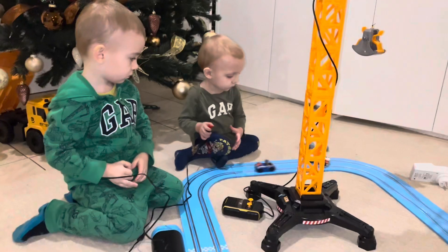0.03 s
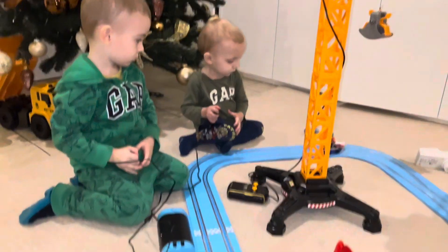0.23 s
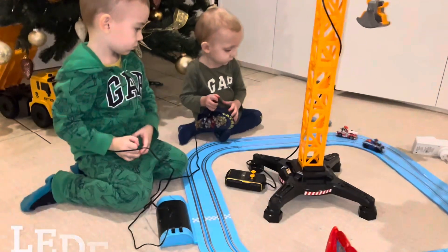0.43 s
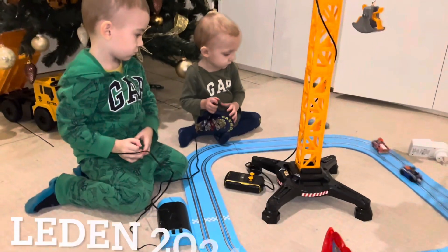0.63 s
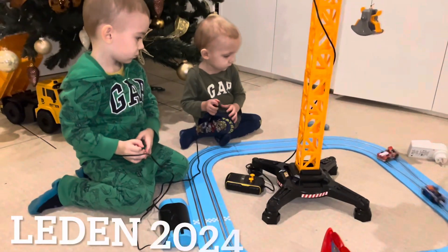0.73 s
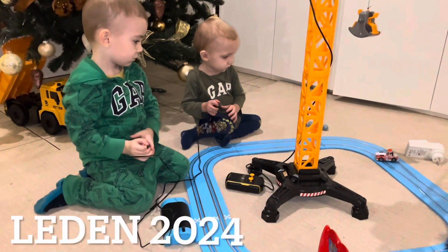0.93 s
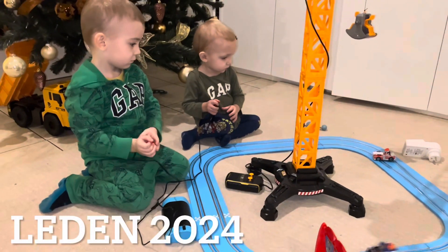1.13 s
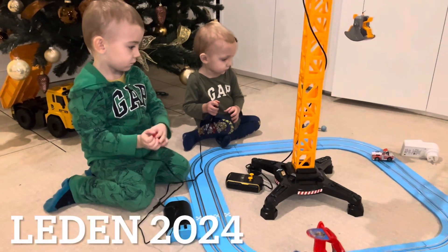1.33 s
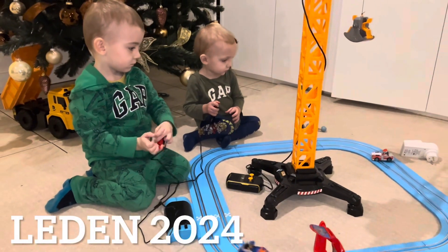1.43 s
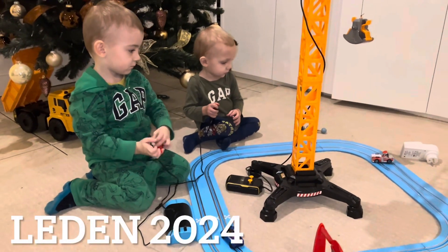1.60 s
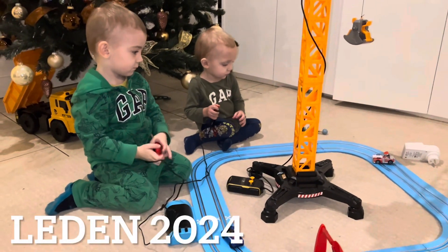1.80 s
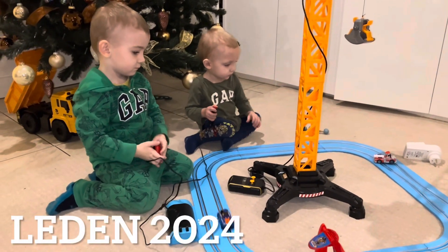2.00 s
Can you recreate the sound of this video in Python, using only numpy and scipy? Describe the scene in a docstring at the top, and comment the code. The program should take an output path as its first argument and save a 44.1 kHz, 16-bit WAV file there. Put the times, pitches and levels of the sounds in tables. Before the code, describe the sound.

Whirring toy car on a plastic track clicks over joints, dies away and pulls off again.

```python
"""A toy slot car whirs round a plastic track on a living-room floor, fades to near silence, starts again.
Its gears and sliding contacts rattle the shell and the track, and the motor sings in brief tones.
Rail joints click and the room answers them, over a low house hum. The sound fades in at the start."""
import sys
import numpy as np
from scipy import signal
from scipy.fft import rfft, irfft, next_fast_len
from scipy.io import wavfile
from scipy.ndimage import uniform_filter1d, map_coordinates

SR = 44100
rng = np.random.default_rng(int(sys.argv[2]) if len(sys.argv) > 2 else 0)


def master(y):
    """Save y as 16-bit WAV."""
    cut = np.clip(np.atleast_2d(y).T, -1, 1)
    pcm = np.round(cut * 32767)  # scale
    wavfile.write(sys.argv[1], SR, pcm.astype(np.int16))


N = 90669
TIME = np.arange(N) / SR


def car_lap():
    """Gears and contacts rattle shell and track: bands swell as the car passes, then the whir fades."""
    # The lap's mix. Each row: time in seconds, shell ring in dB, then in dB over the ring:
    # track rumble, track boom, rolling, gear rasp, contact whine, fizz, treble.
    mix = [(0.1, -37, -22.5, -13, -8, -5.5, -8.5, -10, -17),
           (0.2315, -40.5, -28, -21, -5, -6, -10.5, -13, -19),
           (0.236, -32, -23.5, -32, -7, -4.5, -5, -8.5, -16),
           (0.302, -39, -28, -20, -6, -3.5, -12.5, -8, -16.5),
           (0.424, -44, -17.5, -11.5, 1.5, -4, -5.5, -10.5, -7.5),
           (0.492, -39, -39, -25.5, -7, -6.5, -7, -8.5, -14),
           (0.52, -44.5, -23.5, -20, -0.5, -1.5, -5.5, -7, -11.5),
           (0.594, -39.5, -31, -35, -8, -4, -7, -9.5, -15),
           (0.632, -39, -28.5, -14.5, -5, -6, -8, -9, -14.5),
           (0.704, -36, -43, -20, -9.5, -4.5, -9.5, -12, -18),
           (0.72, -42, -21.5, -14, 0, 1, -5.5, -6.5, -11),
           (0.8, -39, -21.5, -10, -1, -4.5, -10.5, -12, -17.5),
           (0.86, -42, -14.5, -15, -1, -4.5, -6.5, -8, -10.5),
           (0.898, -40.5, -29, -17.5, -6, -4.5, -13.5, -10.5, -12.5),
           (1.058, -43.5, -22.5, -18.5, -4, -0.5, 0.5, -6, -11),
           (1.18, -39.5, -10.5, -15, -4.5, -5, -0.5, -9.5, -16),
           (1.248, -41.5, -22, -15, -5, 0, -3.5, -12, -19),
           (1.268, -35.5, -16, -11, -5.5, -2.5, -11, -10, -7.5),
           (1.306, -36, -20.5, -15, -5.5, -5, -12.5, -13.5, -23.5),
           (1.428, -41.5, -11, -13, -5, 0, 0, -6.5, -9), (1.466, -40, -15.5, -14, -7.5, -4, -8, -11.5, -9),
           (1.62, -52.5, -29, -11, -6.5, -6.5, -16.5, -18, -26.5),
           (1.78, -70, -43, -13.5, -1, -7, -16, -21, -25), (1.84, -66.5, -20, -31, -2.5, -2, -13, -8, -13)]
    # Edges of those bands in Hz, low to high; the shell ring is the fourth band.
    edges = [260, 520, 680, 1850, 3050, 5500, 6900, 10400, 15500]
    # The gear knocks. Each row: time in seconds, knocks per second, knocking share from 0 to 1.
    gears = [(0, 450, 0.08), (1.45, 400, 0.08), (1.84, 100, 0.05)]
    # Tone colour of car and track. Each row: frequency in Hz, level in dB.
    colour = [(150, -59), (250, -41), (353, -30), (516, -22), (593, -3.5), (635, -8.5), (1080, -3.5),
              (1820, -7.5), (2480, 4), (3160, -11), (5040, -12.5), (6210, 3), (7510, -16.5), (9500, -17),
              (10500, -36), (11500, -28.5), (14200, -33), (14900, -55)]
    # Shell resonances. Each row: centre in Hz, width in Hz, lift in dB.
    shell = [(324.3, 24, 10.5), (743, 120, 5), (1085, 12.5, 6), (2230, 110, 1.5), (2482, 67, 3.5),
             (2692, 120, 5), (3214, 155, -5), (6100, 160, -2.5)]
    ring_db, *over_ring = curves(mix)
    levels_db = [ring_db + db for db in over_ring[:3] + [0] + over_ring[3:]]
    colour_db = lambda hz: along(colour, hz) + resonances(shell, hz)
    fade_out = np.clip((mix[-1][0] - TIME) / 0.018 + 1, 0, 1)
    return fade_out * body_rattle(gear_knocks(gears), colour_db, zip(edges, edges[1:]), levels_db)


def car_restart():
    """The car pulls away: slow gear knocks speed up into a whir that comes through in narrow bands."""
    # The rising mix. Each row: time in seconds, shell ring in dB, then in dB over the ring:
    # rumble, low narrow band, high narrow band, rolling, rasp, treble.
    mix = [(1.835, -77, -11, -14, -12, -2, -1, -1), (1.841, -63, -30, -35, -32, -18, 2, -15),
           (1.879, -56.5, -23, -31, -31, -11, -6, -11), (1.889, -56, -20, -23, -33, -32, 0.5, -9),
           (1.913, -53.5, -24, -29, -35, -30, 1, -7.5), (1.943, -50, -21, -16, -19, -31, 3, -10.5),
           (1.953, -50.5, -49, -16, -24, -14, 5, -4), (1.979, -47.5, -24, -23, -14, -16, 2.5, -8.5),
           (2.003, -43.5, -24, -22, -21, -14, 1, -6.5), (2.033, -44.5, -16, -21, -24, -6.5, 4, -7),
           (2.056, -41.5, -12.5, -16, -7, -9.5, -1.5, -13)]
    # Those bands in the same order, ring first. Each row: low edge in Hz, high edge in Hz.
    bands = [(1750, 3140), (318, 492), (715, 760), (875, 1020), (1180, 1660), (3280, 7300), (7440, 15500)]
    # The gears speeding up. Each row: time in seconds, knocks per second, knocking share from 0 to 1.
    gears = [(1.841, 74.4, 0.7), (1.9, 80, 0.4), (1.95, 120, 0.3), (2.06, 200, 0.15)]
    # Tone colour, held flat below 1300 Hz. Each row: frequency in Hz, level in dB.
    colour = [(710, -71), (1200, -39), (1390, -15), (1960, -17), (2540, -8), (3390, -16), (4430, -2.5),
              (8980, -12), (9990, -37), (10900, -15), (13900, -18.5), (14900, -31), (15500, -64)]
    # Ringing resonances. Each row: centre in Hz, width in Hz, lift in dB.
    rings = [(2500, 300, 2), (3890, 580, 12.5), (5920, 360, 6.5)]
    ring_db, *over_ring = curves(mix)
    levels_db = [ring_db + db for db in [0] + over_ring]
    colour_db = lambda hz: along(colour, np.maximum(hz, 1300)) + resonances(rings, hz)
    onset = np.clip((TIME - mix[0][0]) / 0.0055, 0, 1)
    return onset * body_rattle(gear_knocks(gears), colour_db, bands, levels_db)


def gear_knocks(gears, jitter=0.25, scatter_db=5, decay_per_knock=1.8):
    """The rattle's envelope: uneven gear knocks over steady sliding."""
    rate, share = curves(gears)
    running = TIME >= gears[0][0]
    count = np.cumsum(running * rate * np.exp(jitter * wobble(90))) / SR
    strength = amp(scatter_db * rng.standard_normal(N))[count.astype(int)]
    knocks = running * strength * np.exp(-decay_per_knock * (count % 1))
    envelope = np.sqrt(1 - share) + np.sqrt(share) * knocks / rms(knocks[running])
    return envelope / rms(envelope[running])


def body_rattle(envelope, colour_db, bands_hz, levels_db):
    """Knocking noise coloured by shell and track, each band flickering about its own level."""
    below = lambda hz, edge_hz: 1 / (1 + (hz / edge_hz) ** 40)
    colour = lambda hz: amp(colour_db(hz))
    steady = filtered(patchy_noise(depth_db=3)[0], colour)  # unheard: sets each band's scale
    rattle = filtered(patchy_noise(depth_db=1.5) * envelope, colour)
    mid_side = 0
    for db, (low, high) in zip(levels_db, bands_hz):
        band = lambda hz: below(hz, high) - below(hz, low)
        gain = amp(db + 1.05 * wobble(25.16)) / filtered(steady, band).std()
        mid_side = mid_side + gain * filtered(rattle, band)
    return stereo(mid_side)


def motor_tones(waver=0.004, roughness_db=2):
    """The motor sings in short wavering glides, a little out of phase between the ears."""
    # Each row: start in seconds, length in seconds, opening and closing pitch in Hz, level in dB.
    glides = [(0.092, 0.051, 1270, 1290, -46), (0.094, 0.045, 1430, 1403, -45.5),
              (0.199, 0.043, 696, 704, -47), (0.609, 0.15, 590, 584, -58.5),
              (0.63, 0.028, 1203, 1145, -45.5), (1.11, 0.13, 2434, 2460, -41.5),
              (1.287, 0.126, 2422, 2460, -47), (1.44, .17, 2485, 2500, -55), (1.89, 0.089, 753, 736, -63.5),
              (1.955, 0.045, 284, 307, -60.5), (2.015, 0.032, 822, 866, -55.5)]
    out = np.zeros((2, N + SR))
    for start, length, from_hz, to_hz, db in glides:
        n = round(length * SR)
        hz = np.linspace(from_hz, to_hz, n) * (1 + waver * wobble(36)[:n])
        phase = 2 * np.pi * np.cumsum(hz) / SR + rng.normal(0, 0.57, (2, 1))
        level = amp(db + roughness_db * wobble(72.5)[:n])
        swell = signal.windows.tukey(n, 0.39)
        out[:, round(start * SR):][:, :n] += level * swell * np.sqrt(2) * np.sin(phase)
    return out[:, :N]


def rail_joints(rattle_db=-18, crack_side=0.1, room_db=-1, room_delay_s=0.006):
    """Each rail joint gives a sharp crack and a short rattle, then the room answers."""
    # Each row: start in seconds, level in dB, brightness in dB per octave, rattle T60 in seconds.
    joints = [(0.2322, -14, 3, 0.03), (0.2409, -18, 0, 0.025), (1.2624, -23.5, 2, .015),
              (1.2702, -21.5, 9, 0.012)]
    # Tone colour of a click. Each row: frequency in Hz, level in dB.
    colour = [(290, -53), (500, -18), (803, -15.5), (2330, -2.5), (4380, -10.5), (5350, -15), (8980, -20.5),
              (12300, -18), (14800, -25), (15500, -26)]
    out = np.zeros((2, N + SR))
    t = np.arange(SR // 20) / SR
    hz = np.fft.rfftfreq(len(t), 1 / SR)
    for start, db, bright_db, rattle_s in joints:
        burst = rng.standard_normal((2, len(t))) * amp(rattle_db - 60 * t / rattle_s)
        burst[:, 0] = 1, crack_side  # the crack: one impulse in mid and side
        ring = minimum_phase(amp(along(colour, hz) + bright_db * np.log2(1 + hz / 4000)))
        click = amp(db) * signal.fftconvolve(burst, ring[None], axes=1) / np.abs(ring).max()
        reverb = amp(room_db) * signal.fftconvolve(click[:1], room_tail(), axes=1)
        out[:, round(start * SR):][:, :click.shape[1]] += click
        out[:, round((start + room_delay_s) * SR):][:, :reverb.shape[1]] += reverb
    return stereo(out[:, :N])


def room_tail():
    """The living room's answer: noise in which each frequency dies at its own speed."""
    # Each row: frequency in Hz, T60 in seconds.
    decay = [(500, 0.46), (2500, 0.73), (6000, 0.64), (13000, 0.024)]
    hz, t, spectrum = signal.stft(rng.standard_normal((2, SR // 2)), SR, nperseg=256)
    tail = signal.istft(spectrum * amp(-60 * t / along(decay, hz)[:, None]), SR, nperseg=256)[1]
    return tail / np.linalg.norm(tail[0])


def house_hum():
    """The house hums faintly: low noise that drifts in level."""
    # The hum's colour. Each row: frequency in Hz, level in dB.
    colour = [(15, -51), (25, -17), (92, -6), (214, -3.5), (260, -3.5), (340, -13), (570, -120)]
    # Its drift. Each row: time in seconds, level in dB.
    drift = [(0.1, -75), (0.176, -81), (0.272, -73.5), (1.304, -78.5), (1.788, -88.5), (1.934, -73.5),
             (2.05, -81)]
    level_db, = curves(drift)
    hum = filtered(patchy_noise(depth_db=-0.5), lambda hz: amp(along(colour, hz)))
    return stereo(amp(level_db) * hum / rms(hum))


def stereo(mid_side):
    """Left and right from mid and side, with width and balance set by frequency."""
    # Each row: frequency in Hz, side over mid in dB.
    width = [(60, -7), (87, 1), (130, -9), (180, -8), (260, -9), (380, -11.5), (550, 1), (790, -3.5),
             (1140, -2.5), (1650, 0.5), (2380, -2), (3440, -0.5), (4970, 0.5), (7180, -3.5), (10400, 6),
             (15000, -10.5)]
    # Each row: frequency in Hz, left over right in dB.
    balance = [(300, .5), (1300, 1), (3500, 0.5), (8500, -1.5), (13000, -0.5)]
    mid, side = filtered(mid_side, lambda hz: np.array([np.ones_like(hz), amp(along(width, hz))]))
    left_right = np.array([mid + side, mid - side])
    return filtered(left_right, lambda hz: amp(np.outer([0.5, -0.5], along(balance, hz))))


def patchy_noise(depth_db):
    """Mid and side noise with patches of random gain in time and frequency."""
    spectrum = signal.stft(rng.standard_normal((2, N)), nperseg=512)[2]
    patches = uniform_filter1d(rng.standard_normal(spectrum.shape[1:]), size=8, axis=1)
    return signal.istft(spectrum * amp(depth_db * patches / rms(patches)), nperseg=512)[1][:, :N]


def minimum_phase(gains):
    """The impulse response with this spectrum and the sharpest attack."""
    cepstrum = irfft(np.log(gains + 1e-6))
    half = len(cepstrum) // 2
    causal = np.r_[cepstrum[0], 2 * cepstrum[1:half], np.zeros(len(cepstrum) - half)]
    return irfft(np.exp(rfft(causal)))[:half]


def resonances(peaks, hz):
    """The lift in dB from bell-shaped peaks."""
    return sum(db / (1 + (2 * (hz - centre) / width) ** 2) for centre, width, db in peaks)


def filtered(x, response):
    """x shaped by a gain that depends on frequency."""
    size = next_fast_len(N + SR // 2)
    return irfft(rfft(x, size) * response(np.fft.rfftfreq(size, 1 / SR)), size)[..., :N]


def wobble(rate):
    """A smooth random curve, rate knots a second."""
    return map_coordinates(rng.standard_normal(int(N * rate / SR) + 4), [TIME * rate])


def curves(rows):
    """One value per sample for each column after the time."""
    times, *columns = np.transpose(rows)
    return [np.interp(TIME, times, column) for column in columns]


def along(points, hz):
    """(Hz, value) points joined on a log frequency axis."""
    freqs, values = np.transpose(points)
    return np.interp(np.log(hz + 1), np.log(freqs + 1), values)


def amp(db):
    return 10 ** (np.asarray(db) / 20)


def rms(x):
    return np.sqrt(np.mean(x ** 2) + 1e-20)


def scene():
    return car_lap() + car_restart() + motor_tones() + rail_joints() + house_hum()


def record(dry):
    """A quick fade-in and a steep cut of the highest treble."""
    fade_start_s, fade_s, top_hz = 0.037, 0.084, 15700
    fade = np.clip((TIME - fade_start_s) / fade_s, 0, 1)
    return filtered(dry * fade, lambda hz: 1 / (1 + (hz / top_hz) ** 200))


dry = scene()
out = record(dry)
master(out)
```